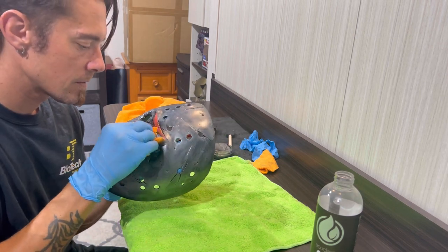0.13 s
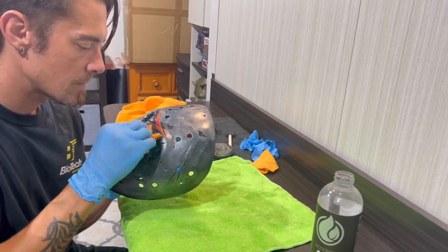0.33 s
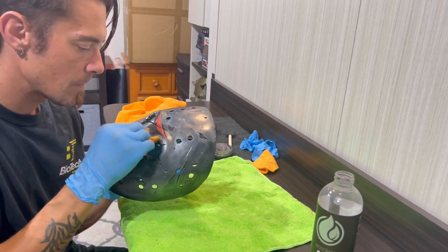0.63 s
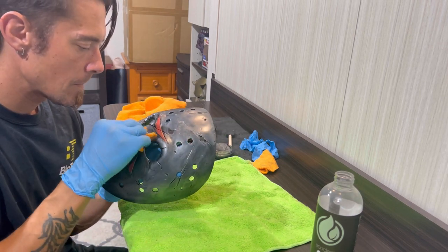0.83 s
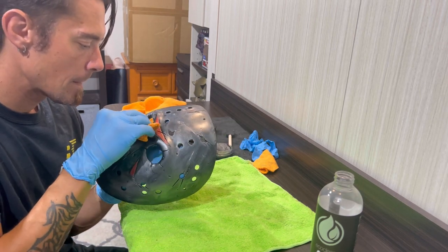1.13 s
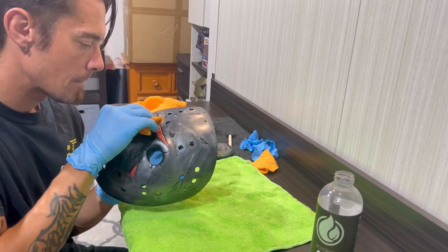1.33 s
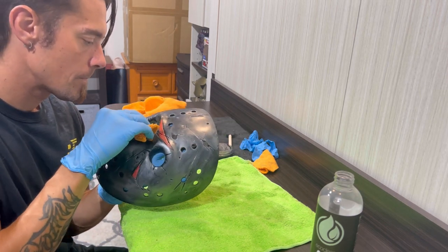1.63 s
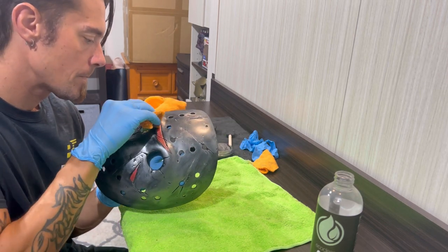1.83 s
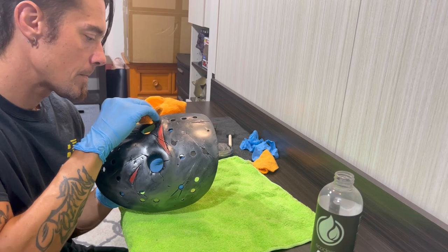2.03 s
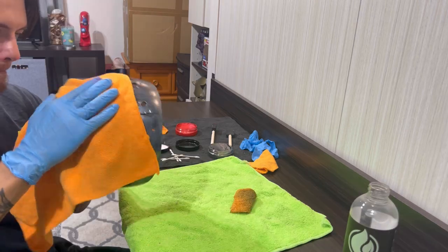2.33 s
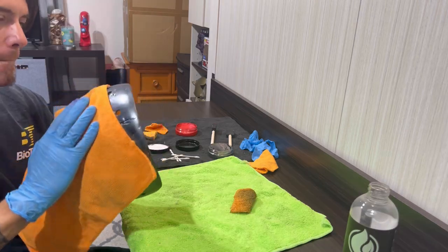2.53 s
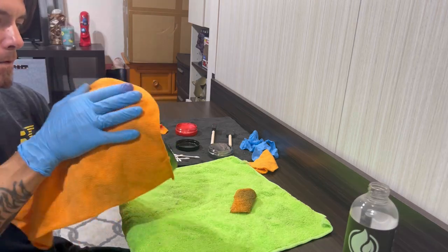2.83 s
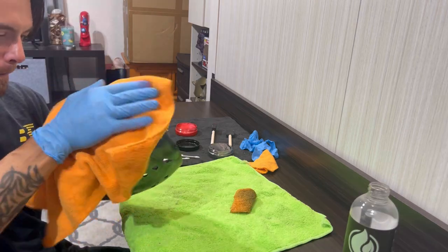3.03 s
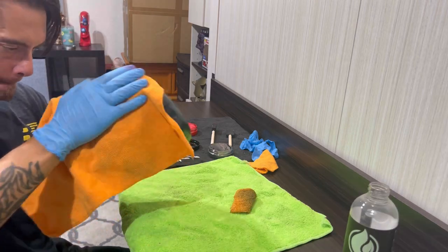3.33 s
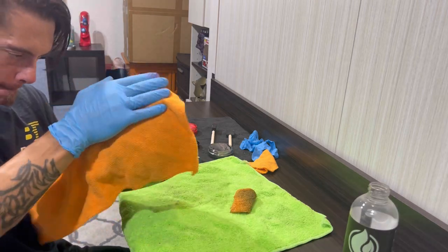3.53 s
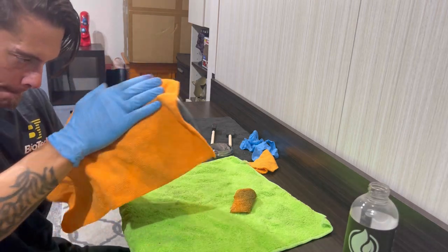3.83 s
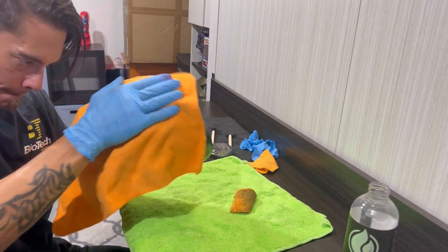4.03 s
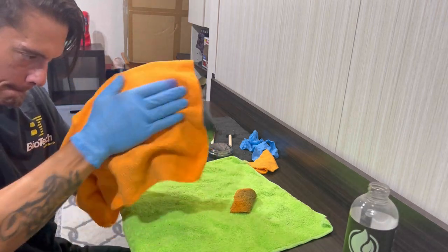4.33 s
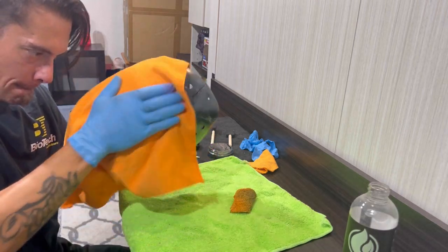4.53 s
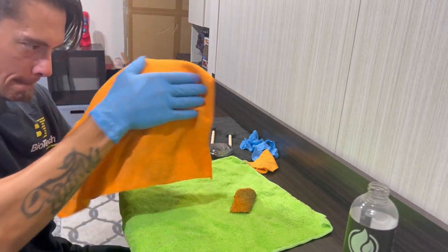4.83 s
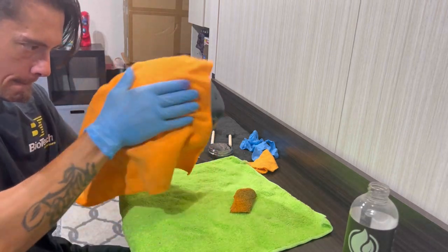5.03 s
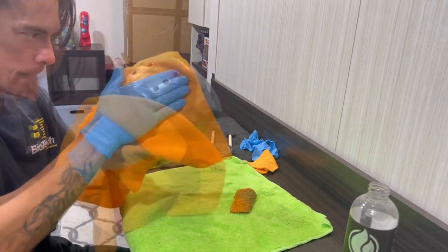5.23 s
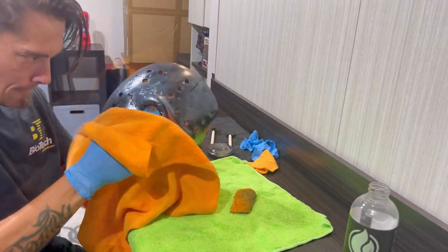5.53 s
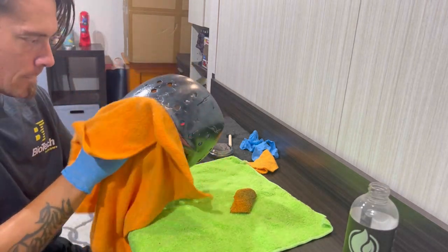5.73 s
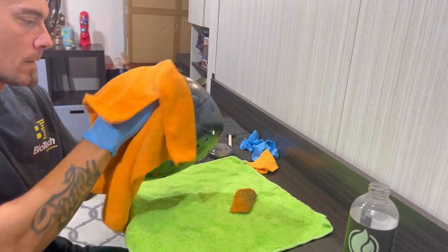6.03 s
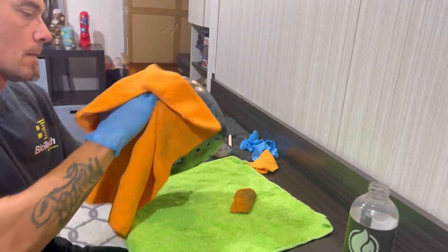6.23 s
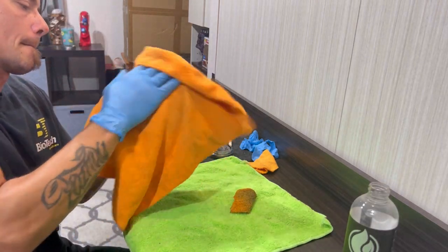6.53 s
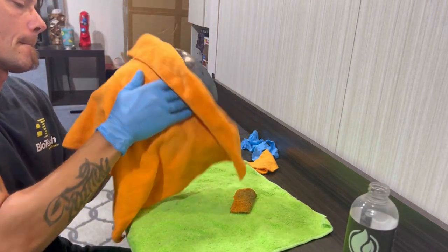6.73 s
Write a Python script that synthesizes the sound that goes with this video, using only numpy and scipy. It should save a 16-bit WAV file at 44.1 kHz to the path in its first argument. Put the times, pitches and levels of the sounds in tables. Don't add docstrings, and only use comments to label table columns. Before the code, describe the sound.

In a small room, a low throbbing hum and soft air rumble run throughout. A small rag makes quiet, fine rubs on a hollow plastic shell. After an abrupt cut, a larger towel drags with a hollow rising whoosh and sharp glove ticks, then scrubs quickly with dull knocks. It eases into slower wipes. Close stereo pickup, little echo.

```python
import sys
import numpy as np
from scipy import signal
from scipy.fft import rfft, irfft, next_fast_len
from scipy.io import wavfile
from scipy.ndimage import uniform_filter1d

SR = 44100
rng = np.random.default_rng(int(sys.argv[2]) if len(sys.argv) > 2 else 0)


def dump(signal):
    limited = np.clip(np.atleast_2d(signal).T, -1, 1)
    pcm = np.round(limited * 32767).astype(np.int16)
    wavfile.write(sys.argv[1], SR, pcm)


def undo_db(level):
    steps = np.asarray(level, float) / 20
    return 10 ** steps


N = 303849
T = np.arange(N) / SR
SIZE = next_fast_len(N + SR // 2)
F = np.maximum(np.arange(SIZE // 2 + 1) * SR / SIZE, 1)
LOG_F = np.log(F)
CUT_S = 2.14
ROOM_T60_S = 0.33


def unit(x):
    return x / np.sqrt(np.mean(x ** 2))


def colour(x, gain):
    return irfft(rfft(x, SIZE) * gain, SIZE)[..., :N]


def shape(table, column=1):
    rows = np.array(table)
    return undo_db(np.interp(LOG_F, np.log(rows[:, 0]), rows[:, column]))


def walk(rate):
    held = np.repeat(rng.standard_normal(int(N / SR * rate) + 2), repeats=8)
    smooth = uniform_filter1d(uniform_filter1d(held, size=8), size=8)
    return np.interp(T * rate * 8, np.arange(len(held)), unit(smooth))


def strokes(table, rub_db, rub_share):
    s, hiss_db, press_db = np.transpose(table)
    gap_ms = np.diff(s) * 1000
    before, after = np.r_[gap_ms[0], gap_ms], np.r_[gap_ms, gap_ms[-1]]
    pace_ms = 2 * before * after / (before + after)
    length_ms = np.minimum(0.6 * pace_ms, 62)
    return list(zip(s, hiss_db, length_ms, rub_db + rub_share * press_db, press_db))


# [t/s, fibre hiss level/dB, pressure/dB]
CONTACT = [(0.0, -86, -1), (0.76, -85.5, -5), (1.12, -91, -6), (1.69, -86.5, 8), (2.12, -80.5, 15.5),
           (2.15, -82.5, 3), (2.55, -77, 4), (2.7, -67, -7), (3.14, -65.5, -3), (3.36, -68.5, -7),
           (4.71, -67, 2), (4.86, -69, -2), (5.32, -73.5, -1), (5.7, -71.5, -13), (6.39, -68.5, -7),
           (6.61, -65, -6.5), (6.77, -67, -3.5), (6.89, -75, 1)]
# [t/s, fibre hiss level/dB, pressure/dB]
RAG_STROKES = [(0.027, -69, -7), (0.104, -71, -20), (0.202, -74.5, -11), (0.304, -70.5, -3),
               (0.384, -76, -4), (0.463, -68.5, -13), (0.576, -72, -21), (0.655, -70.5, -20),
               (0.766, -75, -12), (0.832, -72, -11), (0.934, -75.5, -9), (1.28, -77.5, 5),
               (1.392, -73.5, -6), (1.511, -79, -6), (1.58, -76, -2), (1.976, -73.5, 5.5),
               (2.072, -76.5, 4)]
# [t/s, fibre hiss level/dB, pressure/dB]
SCRUB = [(3.171, -61, 1), (3.223, -63, -1.5), (3.287, -61, -10), (3.349, -57.5, -4), (3.407, -61.5, -10),
         (3.477, -61, 0), (3.54, -61.5, 2), (3.593, -58, -1.5), (3.664, -59.5, -6.5), (3.729, -61, 0),
         (3.797, -64, 4.5), (3.858, -63, 3.5), (3.923, -61, -7), (3.986, -60, 0), (4.043, -66, -1.5),
         (4.11, -61, 0), (4.184, -59, -3), (4.253, -64.5, 5), (4.317, -64, 4.5), (4.386, -64, 0),
         (4.468, -58.5, -4.5), (4.526, -61, -9), (4.602, -64, 4.5), (4.663, -59.5, -11), (4.737, -62, -4),
         (4.793, -59, -11.5), (4.856, -63, -8), (4.935, -61, 0.5)]
# [t/s, fibre hiss level/dB, pressure/dB]
WIPES = [(2.719, -64.5, -4), (2.795, -61, -0.5), (2.893, -65, -1.5), (2.99, -59, -1.5), (3.088, -62, -0.5),
         (5.02, -62, -18), (5.092, -66.5, 1.5), (5.214, -66, 3.5), (5.31, -72.5, -7), (5.407, -69, 4),
         (5.616, -71, 1.5), (5.761, -64, -13), (5.891, -65, -10), (5.992, -61, -16), (6.133, -62, -12),
         (6.242, -60, -20), (6.351, -61, -9), (6.444, -59.5, -14), (6.569, -66, 2.5), (6.652, -65, -9)]
# [t/s, fibre hiss level/dB, length/ms, rub
# relative level/dB, shell relative level/dB]
MORE_STROKES = [(1.082, -81, 93, 0, 7), (1.225, -93, 170, -12, 27), (1.739, -79, 25, -12, -1),
                (2.165, -68, 41, 3.5, 3), (2.225, -60, 59, 0.5, 0.5), (2.36, -72, 44, 7.5, -13),
                (2.437, -52.5, 73, -2.5, -21), (2.5, -62, 67, 0.5, -12), (2.68, -69.5, 72, 4.5, -2),
                (6.76, -79, 70, -14, -8), (6.85, -76, 77, -11, -11), (4.945, -57.5, 26, -13, -2.5),
                (5.17, -71, 21, 7.5, 0)]


def friction():
    s, hiss_db, press_db = np.transpose(CONTACT)
    resting_db = (0, -0.2, press_db)
    power = np.array([undo_db(np.interp(T, s, hiss_db + d)) ** 2 for d in resting_db])
    towel_rub = (1.4, 0.42)
    hand = strokes(RAG_STROKES, -11, -0.05) + strokes(SCRUB, *towel_rub) + strokes(WIPES, *towel_rub)
    for at, db, ms, rub_db, shell_db in hand + MORE_STROKES:
        span = slice(max(int((at - .15) * SR), 0), int((at + .15) * SR))
        away = abs(T[span] - at)
        for k, (rel_db, narrow) in enumerate([(0, 1.), (rub_db, .9), (shell_db, .8)]):
            swell = np.exp(-(away / (narrow * .00048 * ms)) ** 2.4)
            power[k, span] += undo_db(db + rel_db) ** 2 * swell
    grip = walk(140)
    patchy_db = [1.2 * grip, 1.5 * grip + .8 * walk(70), 1.2 * grip + .8 * walk(50)]
    return power * undo_db(np.array(patchy_db)) ** 2


def fibres():
    snag = 0.18 * np.minimum(rng.exponential(size=N), 5)
    return rng.standard_normal(N) * np.exp(snag)


# [f/Hz, level/dB]
RAG_HISS = [(4500, -44), (6500, -10), (8000, -2.5), (10200, -8), (12000, 4), (14000, 3.5), (16000, -14)]
# [f/Hz, level/dB]
TOWEL_HISS = [(4500, -48), (6500, -6), (7800, 0.5), (9000, 0), (10200, -13), (12000, 2), (14000, -2.5),
              (16000, -11)]
# [f/Hz, level/dB]
RUB = [(900, -17.5), (1500, 1), (2500, -0.5), (3300, -4), (4500, -6), (6000, -4.5), (8000, -13)]
# [f/Hz, level/dB]
SHELL = [(100, -11), (200, -3.5), (350, -1.5), (550, -10), (820, -9), (1300, -16.5), (2000, -48.5)]


def cloth(power, gain):
    spectra = np.array([shape(s) for s in (RAG_HISS, TOWEL_HISS, RUB, SHELL)])
    rag, towel, rub, shell = colour(fibres(), spectra)
    hiss = np.where(T < CUT_S, unit(rag), unit(towel))
    layers = [hiss, unit(rub) * undo_db(2.0), unit(shell) * undo_db(3.5)]
    return colour(np.sum(np.sqrt(power) * layers, axis=0), gain)


# [f/Hz, left level/dB, right level/dB]
DIFFUSE = [(96, -3, 10), (350, -5, 0), (1200, 0, -3), (3000, 3, -2), (5170, 6, -1), (7300, -4.5, -7.5),
           (9900, -13, -14.5), (11800, -4, -21), (13400, -13, -15), (15400, -14, -2)]


def spread(power):
    keep = np.exp(-2 * np.log(1000) / ROOM_T60_S / SR)
    trail = 0.72 * power + 0.49 * signal.lfilter([1 - keep], [1, -keep], power)
    return np.array([cloth(trail, shape(DIFFUSE, column=k)) for k in (1, 2)])


def splice():
    fade_out = 0.15 + (CUT_S - T) / 0.015
    fade_in = (T - CUT_S) / 0.037
    fade = np.where(T < CUT_S, fade_out, fade_in)
    over = np.interp(T, (4.81, 5.83), (0, 1))
    return np.minimum(fade, 1) * np.array([T < CUT_S, (T >= CUT_S) * (1 - over), over])


SHOTS = [
    (-.11, -.43),
    (.335, 0.),
    (.73, .03),
]
# [multiple of its pitch, rms level/dB, wobble/dB]
MOTOR = [(1, -45, -0.77), (2, -68.5, 0.5), (3, -66, 1), (4, -76.5, 4), (5, -80, 3.5)]
MAINS_SHARE = [0.45, 0.81, 1.16]


def hum():
    motor_hz, other_hz, mains_hz = 68.955, 80, 120
    gains, (turn, other) = splice(), np.transpose(SHOTS)
    tones = [(m * motor_hz, m * turn, db, wobble_db, 1) for m, db, wobble_db in MOTOR]
    tones.append((other_hz, other, -57.5, 2.5, 1))
    tones.append((mains_hz, turn, -65.5, 1.5, np.array(MAINS_SHARE)))
    out = 0
    for hz, start, db, wobble_db, share in tones:
        shots = share * np.exp(2j * np.pi * start) @ gains
        spin = np.exp(2j * np.pi * hz * T) * shots
        out = out + np.sqrt(2) * undo_db(db + wobble_db * walk(5)) * spin.real
    return out * undo_db(np.array([[-.35], [.35]]))


# [f/Hz, level/dB]
AIR = [(22, -23.5), (38, -2), (60, 2.5), (120, -3.5), (170, -7), (350, -15.5), (780, -36), (1000, -30),
       (1400, -44), (2500, -48.5), (4000, -57.5), (7000, -71), (10000, -67), (16000, -52)]
# [f/Hz, width/Hz, level/dB, left minus right level/dB]
FAN = [
    (1780, 343, -72, 45),
    (2020, 270, -81.5, 13.5),
    (6650, 340, -84.5, 46),
]


def air():
    mid, side = rng.standard_normal((2, N))
    apart = colour(side, np.clip(F / 800, .2, 1))
    rumble = colour(mid + apart * np.array([[1], [-1]]), shape(AIR))
    out = unit(rumble) * undo_db(-56 + 0.72 * walk(6))
    for hz, width, db, pan_db in FAN:
        band = unit(colour(rng.standard_normal(N), np.exp(-((F - hz) / width) ** 2)))
        out += band * undo_db(db + 0.73 * walk(9.5)) * undo_db(np.array([[0], [-pan_db]]))
    return out * np.sqrt(np.sum(splice() ** 2, axis=0))


# [t/s, peak level/dB, f/Hz, overtone level/dB]
KNOCKS = [(2.773, -51.5, 233, 2), (3.152, -41.5, 225, -7), (3.402, -36.5, 215, -9), (3.41, -47, 290, -3),
          (3.668, -45, 200, -11), (3.784, -40, 228, -11), (4.448, -52, 250, -9), (4.509, -43, 323, -5),
          (4.577, -37, 208, -1), (4.593, -39.5, 185, -7), (4.657, -48, 320, -3), (4.716, -50, 385, -7),
          (4.835, -44.5, 233, -5.5), (4.462, -40.5, 140, -3), (4.72, -43.5, 170, -5),
          (4.738, -50, 170, -10), (5.607, -49.5, 350, -11), (2.125, -47.5, 247, -3)]


def knocks():
    out, t = np.zeros(N), T[:SR // 20]
    for at, db, hz, over_db in KNOCKS:
        turn = 2 * np.pi * hz * t
        overtones = (np.sin(2.1 * turn) + .55 * np.sin(3.3 * turn)) * np.exp(-t / .003)
        ring = np.sin(turn) * np.exp(-t / 0.0054) + undo_db(over_db) * overtones
        soft_start = 1 - np.exp(-t / .0016)
        out[int(at * SR):][:len(t)] -= undo_db(db + 6) * ring * soft_start
    return out


# [t/s, peak level/dB, dull part relative level/dB, length/ms]
TICKS = [
    (2.136, -58, 7, 1.4),
    (5.07, -54, 1.5, 2.5),
    (2.539, -37.5, -20, 1.2),
    (2.553, -44, -5, 1.7),
    (2.599, -51.5, 2, 5.8),
    (2.647, -34, -3.5, 1.5),
]


def ticks():
    dull, bright, t = np.zeros(N), np.zeros(N), T[:SR // 40]
    noises = rng.standard_normal((len(TICKS), len(t)))
    for (at, db, dull_db, ms), noise in zip(TICKS, noises):
        burst = undo_db(db) * noise * np.exp(-t / (0.00078 * ms))
        bright[int(at * SR):][:len(t)] += burst
        dull[int(at * SR):][:len(t)] += burst * undo_db(dull_db)
    treble = 1 / (1 + (SPLIT_HZ / F) ** 6)
    middle = (1 - treble) / (1 + (1200 / F) ** 4)
    return colour(bright, treble) + colour(dull, middle) * 2.5


# [t/s, level/dB, cavity f/Hz]
DRAG = [(2.3, -90, 1250), (2.35, -60.5, 1300), (2.4, -54, 1480), (2.44, -60, 1720), (2.49, -52.5, 1606),
        (2.53, -55, 1644), (2.558, -52.5, 1620), (2.59, -94, 1590)]
# [multiple of cavity pitch, width/Hz, level/dB]
CAVITY = [(1., 200, 1), (1.33, 200, 0.5), (1.7, 280, -2.5)]


def drag():
    s, db, hz = np.transpose(DRAG)
    pitch = np.interp(T, s, hz) * (1 + 0.028 * walk(24.96))
    turn = 2 * np.pi * np.cumsum(pitch) / SR
    hollow = 0
    for multiple, width, g_db in CAVITY:
        a, b = colour(rng.standard_normal((2, N)), 1 / (1 + (2 * F / width) ** 2))
        hollow = hollow + undo_db(g_db) * unit(a * np.cos(multiple * turn) + b * np.sin(multiple * turn))
    level_db = np.interp(T, s, db, left=-150, right=-150) + 2.6 * walk(160)
    return unit(hollow) * undo_db(level_db)


# [t/s, peak level/dB, f/Hz, length/ms]
CHIRPS = [(4.612, -54, 1500, 11), (4.74, -58, 1550, 16), (4.866, -59, 1550, 12), (4.901, -57, 1060, 10),
          (4.945, -52, 2230, 12), (5.168, -53.5, 1370, 10), (5.88, -60, 2500, 10), (6.12, -58, 1200, 10)]


def chirps():
    out = np.zeros(N)
    for at, db, hz, ms in CHIRPS:
        t = T[:int(ms * SR / 1000)]
        squeak = np.hanning(len(t)) * np.sin(2 * np.pi * hz * t)
        out[int(at * SR) - len(t) // 2:][:len(t)] += undo_db(db) * squeak
    return out


SPLIT_HZ, PORT_LAG_S, TREBLE_LATE_S = 6000, .00015, .0016


def ports(wide, hits):
    low = 1 / (1 + (F / SPLIT_HZ) ** 8)
    late = np.exp(-2j * np.pi * F * TREBLE_LATE_S)
    t = T[:SR // 3]
    out = []
    for side, column, tail in zip((1, -1), (1, 2), rng.standard_normal((2, len(t)))):
        lead = np.exp(1j * np.pi * F * PORT_LAG_S * side)
        direct = low * lead + (1 - low) * late / lead
        wash = tail * np.exp(-np.log(1000) * t / ROOM_T60_S) * (t > .002)
        wash = rfft(wash / np.sqrt(np.sum(wash ** 2)), SIZE) * shape(DIFFUSE, column)
        out.append(colour(wide + hits, direct) + colour(hits, wash) * undo_db(-9))
    return np.array(out)


def scene():
    power = friction() * np.clip(abs(T - CUT_S) / .01, .1, 1) ** 2
    hits = drag() + knocks() + ticks() + chirps()
    work = ports(cloth(power, 0.89), hits) + spread(power)
    turn = np.exp(0.17j * np.array([[-1], [1]]) / (1 + (F / 700) ** 4))
    return work * undo_db(-2.5) + colour(hum() + air(), turn)


def top_cut(x):
    return signal.sosfilt(signal.butter(12, 15950, fs=SR, output="sos"), x)


def record(dry):
    return top_cut(colour(dry, F < 15760))


dry = scene()
out = record(dry)
dump(out)
```